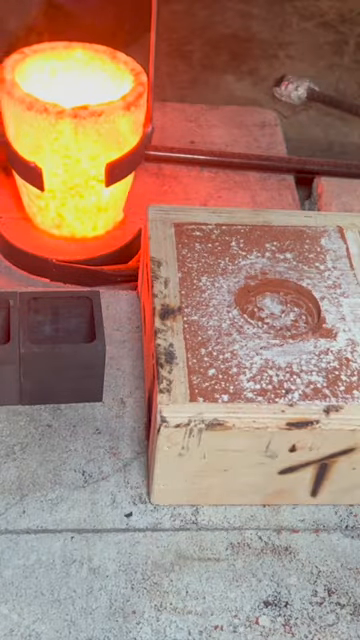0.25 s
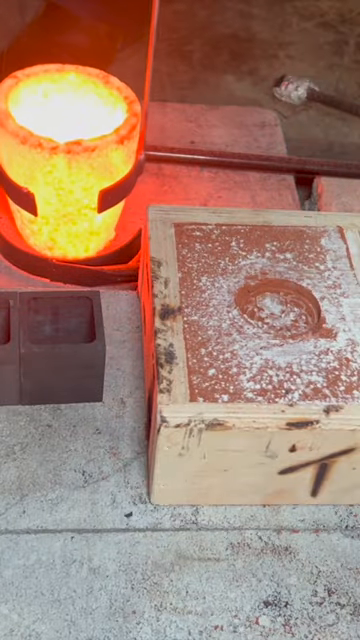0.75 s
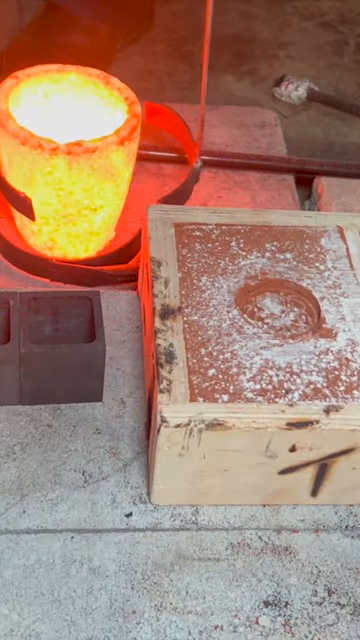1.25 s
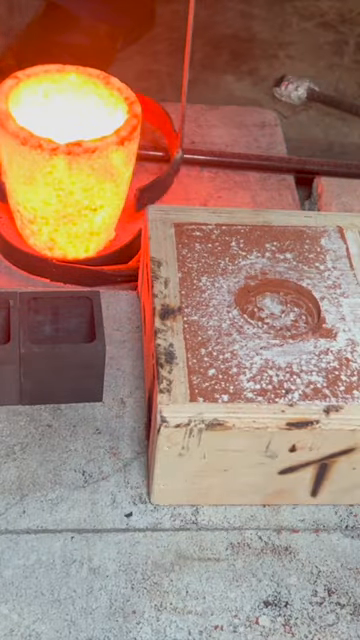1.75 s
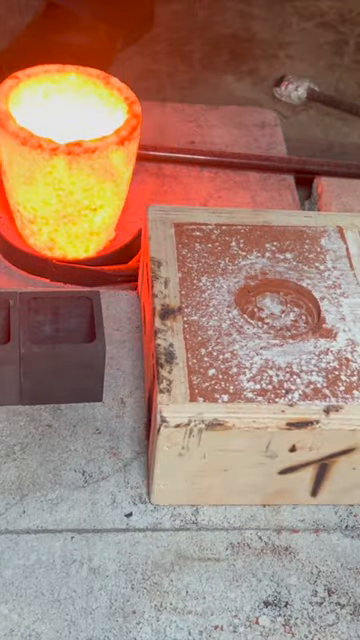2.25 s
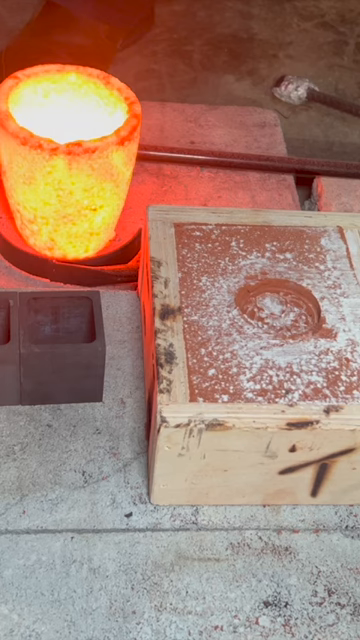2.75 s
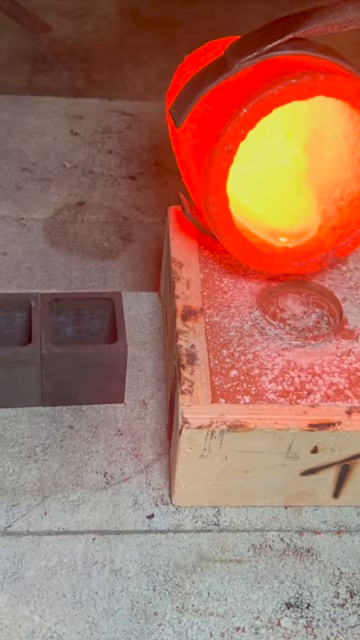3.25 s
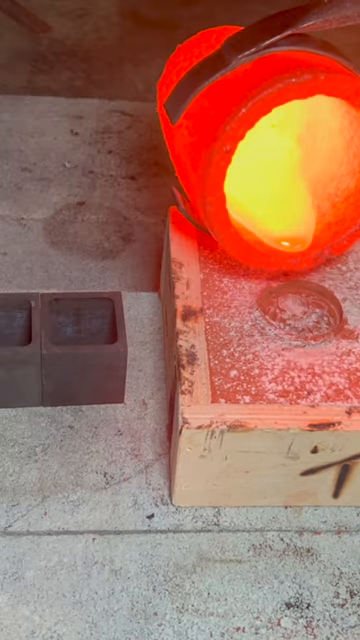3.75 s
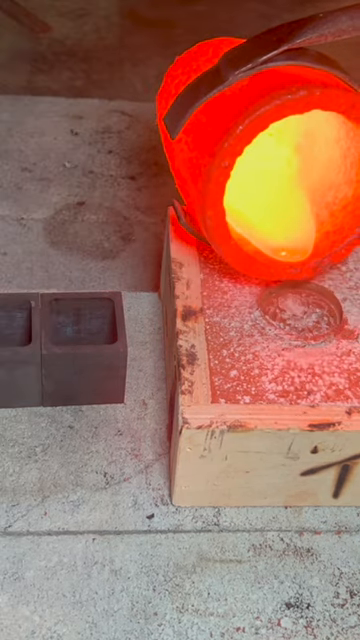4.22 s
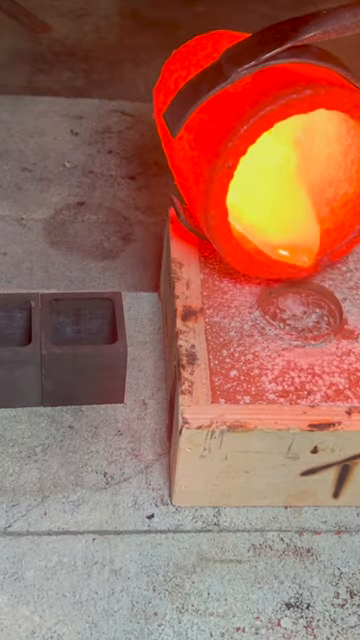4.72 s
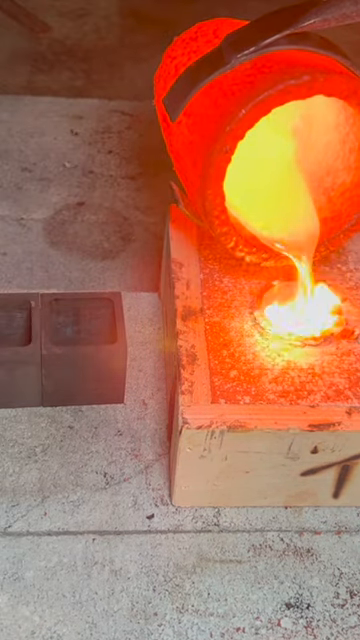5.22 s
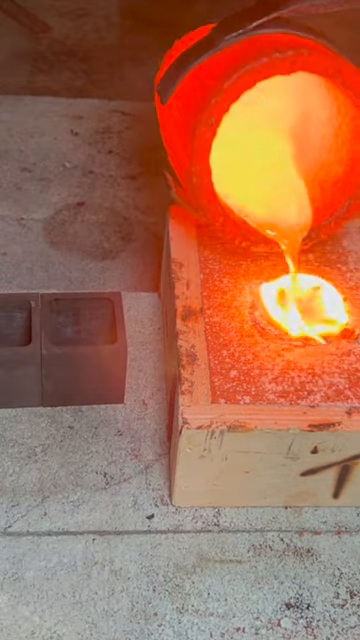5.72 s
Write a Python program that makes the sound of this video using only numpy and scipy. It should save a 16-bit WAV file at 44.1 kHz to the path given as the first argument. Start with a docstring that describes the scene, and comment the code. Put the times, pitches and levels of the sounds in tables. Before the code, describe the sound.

Quiet workshop rumble with tong scrapes, one loud bright metallic clank, small ticks and creaks, then a faint gurgling, crackling pour into a mould.

```python
"""A low workshop rumble is heard first, then steel tongs scrape on a crucible by stick and slip.
Dropped steel skids and clanks on the concrete floor: a chatter of contacts excites its modes.
The loaded tongs tick, rub and creak: shaped bursts of filtered noise.
Molten metal splats into a sand mould: falling sine chirps over a noise crunch and a granular gurgle.
Swells of crackling hiss continue as the mould sizzles; a diffuse tail of noise is the room."""
import sys
import numpy as np
from scipy import signal
from scipy.fft import rfft, irfft
from scipy.io import wavfile

SR = 44100
rng = np.random.default_rng(int(sys.argv[2]) if len(sys.argv) > 2 else 0)


def to_wav(sig):
    """Store sig (one row per channel, or 1-D mono) as 16-bit WAV at the path in sys.argv[1].

    Samples outside -1..1 are clipped; the rate is SR.
    """
    pcm = np.clip(np.atleast_2d(sig), -1, 1) * 32767
    pcm = np.round(pcm).astype(np.int16)
    wavfile.write(sys.argv[1], SR, pcm.T)  # frames by channels


N = 263718
TIME = np.arange(N) / SR
EDGE_HZ = 16100  # upper band limit
TILT_S = 3.05  # the crucible is tilted over the mould

# swells of rustle and hiss, as the tools are handled and then as the mould sizzles:
# (middle [s], length [s], rustle level [dB], hiss level [dB])
SWELLS = [(.7, 0.73, -79, -80), (2.62, .8, -73.5, -78.5), (3.415, 0.72, -72, -79.5),
          (4.17, 1.03, -78.5, -79), (5.2, 1.25, -79, -75.5), (5.919, 0.77, -81, -76.5)]
# contacts of the steel with the floor: (time [s], relative level [dB])
CLANK = [(2.485, -18.5), (2.4872, -20.5), (2.4924, -24), (2.5072, -29.5)]
# blobs of metal landing in the sand: (time [s], relative level [dB])
SPLATS = [(4.836, -50), (4.846, -42), (4.8527, -34), (4.8615, -38), (4.8693, -38.5), (4.8909, -37),
          (4.9324, -44), (4.946, -52), (5.0997, -47), (5.228, -56), (5.3429, -51), (5.516, -53.5),
          (5.615, -56.5)]


def amp(db):
    """Logarithmic level: decibels to amplitude gain."""
    return 10 ** (np.asarray(db) / 20)


def unit(x):
    """Power normalisation: scales to rms 1."""
    return x / np.sqrt(np.mean(x ** 2) + 1e-20)


def read(points, hz):
    """Interpolation along a logarithmic frequency axis, as pitch is heard."""
    f, value = np.transpose(points)
    return np.interp(np.log(hz + 1), np.log(f + 1), value)


def level(rows):
    """Amplitude envelope, linear in dB between rows and silent beyond 0.1 s outside them."""
    s, db = np.transpose(rows)
    return amp(np.interp(TIME, s, db)) * (TIME >= s[0] - .1) * (TIME <= s[-1] + .1)


def fade(t, t60):
    """Exponential decay of a damped system, 60 dB down at t60."""
    return np.exp(-np.log(1000) * t / np.maximum(t60, 1e-3))


def arch(middle_s, length_s):
    """Raised-cosine envelope: a smooth rise and fall."""
    return np.cos(np.pi * np.clip((TIME - middle_s) / length_s, -.5, .5)) ** 2


def stroke(start_s, hold_s, rise_s, t60):
    """Exponential approach to a steady force, a hold, then exponential release."""
    t = np.maximum(TIME - start_s, 0)
    return (1 - np.exp(-t / rise_s)) * fade(np.maximum(t - hold_s, 0), t60)


def together(gains):
    """Incoherent summation: the powers of unrelated noises add."""
    return np.sqrt(sum(gain ** 2 for gain in gains))


def add(mix, s, sound):
    """Linear superposition of a sound starting at time s."""
    part = mix[..., round(s * SR):][..., :sound.shape[-1]]
    part += sound[..., :part.shape[-1]]


def colour(x, points, size=4096):
    """Minimum-phase filtering to a spectrum; white noise keeps its power."""
    log_gain = np.log(amp(read(points, abs(np.fft.fftfreq(size, 1 / SR)))))
    # the Hilbert transform of log gain supplies the phase of a causal filter
    spectrum = np.exp(signal.hilbert(log_gain).conj())
    taps = np.fft.ifft(spectrum).real[:size // 2]
    taps = taps / np.linalg.norm(taps)
    return signal.oaconvolve(x, taps[None], axes=1)[:, :x.shape[1]]


def pair(x):
    """Interchannel coherence: mixes two unrelated signals into a microphone pair, band by band."""
    # likeness of left and right in a diffuse field: (frequency [Hz], coherence [-1 to 1])
    alikeness = [(100, 0.96), (300, 0.86), (800, 0.16), (2000, 0.42), (4000, 0.12), (6000, 0.56),
                 (8000, 0.36), (12000, 0.072), (14000, 0.92)]
    z = rfft(x)
    alike = np.clip(read(alikeness, np.fft.rfftfreq(x.shape[1], 1 / SR)), -1, 1)
    right = alike * z[0] + np.sqrt(1 - alike ** 2) * z[1]
    return irfft(np.array([z[0], right]), x.shape[1])


def noise(count):
    """Gaussian white noise at two partly coherent microphones."""
    return pair(rng.standard_normal((2, count)))


def leftward(x):
    """Interchannel level difference of tools lying to the left."""
    # (frequency [Hz], left minus right [dB])
    lean = [(700, 0), (1300, 2.5), (2400, 2.5), (4200, 6), (6000, 6.5), (8000, 2.5), (12000, 0)]
    lean_db = read(lean, np.fft.rfftfreq(N, 1 / SR))
    return irfft(rfft(x) * amp(np.array([lean_db, -lean_db]) / 2), N)


def dying(x, t60s):
    """Frequency-dependent damping: every band decays at its own rate."""
    hz, t, z = signal.stft(x, SR, nperseg=256)
    decay = fade(t, read(t60s, hz)[:, None])
    return signal.istft(z * decay, SR, nperseg=256)[1]


def grains(per_s, spread_db, size=40):
    """Random point process: millisecond noise puffs of uneven strength, scaled to rms 1."""
    strength_db = np.minimum(spread_db * rng.exponential(1, N), 14)
    strength = amp(strength_db) * (rng.random(N) < per_s / SR)
    power = np.convolve(strength ** 2, np.hanning(size), "same")
    return unit(noise(N) * np.sqrt(power))


def ringing(hz, db, t60):
    """Modal superposition: dying sines, each with its own phase at each microphone."""
    t = np.arange(SR // 2) / SR
    phase = rng.uniform(0, 2 * np.pi, len(hz)) + 1.3 * rng.standard_normal((2, len(hz)))
    modes = fade(t, t60[:, None]) * np.exp(2j * np.pi * hz[:, None] * t)
    return ((amp(db) * np.exp(1j * phase)) @ modes).real


def room(x, gap_s=0.002):
    """Diffuse reverberation: convolution with noise that builds up, then decays band by band."""
    # reverberation time: (frequency [Hz], t60 [s])
    room_t60 = [(100, 0.46), (500, 0.19), (2000, 0.25), (6000, 0.33), (14000, 0.28)]
    tail = dying(noise(SR), room_t60)
    tail *= 1 - np.exp(-(np.arange(tail.shape[1]) / SR / gap_s) ** 2)
    return signal.oaconvolve(x, tail / np.linalg.norm(tail[0]), axes=1)[:, :N]


def rumble(drift_gain_db=2, bump_s=0.14):
    """Band-shaped Gaussian noise: a slowly drifting rumble with soft low bumps."""
    # slow drift, before its gain: (time [s], level [dB])
    drift = [(0.0, -68.5), (0.2, -67.5), (2.05, -63.5), (2.41, -57), (2.96, -64.5), (3.48, -62.5),
             (4.53, -71), (5.98, -68.5)]
    # soft bumps: (middle [s], level [dB])
    bumps = [(.1, -60.5), (.58, -61), (2.24, -52.5), (2.51, -55.5), (3.27, -57.5), (3.61, -56),
             (4.871, -59), (5.13, -63.5), (5.562, -57), (5.9, -65)]
    # relative power density: (frequency [Hz], density [dB per Hz])
    spectrum = [(18, -40), (30, -16.5), (40, -3), (55, -5.5), (82, 2.5), (115, -6), (170, -11.5),
                (250, -23), (400, -35), (700, -54.5)]
    hz = np.fft.rfftfreq(N, 1 / SR)
    swell = together([amp(drift_gain_db) * level(drift)] + [amp(db) * arch(s, bump_s) for s, db in bumps])
    return unit(irfft(rfft(noise(N)) * amp(read(spectrum, hz)), N)) * swell


def air(still_db=-80):
    """Steady noise plus random grains: faint air that swells into rustle."""
    # relative power density: (frequency [Hz], density [dB per Hz])
    spectrum = [(150, -1.5), (300, 5), (500, -2), (800, -5.5), (1200, -8.5), (1900, -8.5), (2700, -14.5),
                (4000, -16.5), (8000, -24.5), (14000, -38)]
    rustle = together([amp(still_db)] + [amp(db) * arch(s, length) for s, length, db, _ in SWELLS])
    return colour(noise(N) + 0.51 * grains(per_s=320, spread_db=4.5), spectrum) * rustle


def hiss(still_db=-87):
    """Steady noise plus sparser grains: a hiss with a fine crackle in it."""
    # relative power density: (frequency [Hz], density [dB per Hz])
    spectrum = [(1000, -26), (4500, -6.5), (6000, -11), (8000, -2), (11500, -0.5), (13500, 1.5),
                (16000, -2.5)]
    sizzle = together([amp(still_db)] + [amp(db) * arch(s, length) for s, length, _, db in SWELLS])
    return colour(noise(N) + 0.81 * grains(per_s=110, spread_db=3.0), spectrum) * sizzle


def thin_hiss():
    """Filtered Gaussian noise: a thin steady hiss near 2.7 kHz from about 3 s to the end."""
    # (time [s], level [dB])
    envelope = [(2.85, -105), (3.05, -85), (4.5, -87.5), (5.98, -80.5)]
    # relative power density: (frequency [Hz], density [dB per Hz])
    spectrum = [(1000, -33), (2200, -8.5), (2700, -3.5), (3300, -23.5), (6000, -20)]
    return colour(noise(N), spectrum) * level(envelope)


def workshop():
    """Superposition of the background noises."""
    return rumble() + air() + hiss() + thin_hiss()


def faint_ticks(per_s=7, mean_db=-64, spread_db=3, knock_db=-7.5):
    """Uniformly random instants after the tilt: rows (time [s], snap [dB], knock re snap [dB])."""
    span_s = N / SR - TILT_S
    draws = rng.random((max(round(per_s * span_s), 1), 2))
    return [(TILT_S + when * span_s, mean_db + spread_db * (2 * size - 1), knock_db)
            for when, size in draws]


def ticks(ring_s=0.018, knock_ring_s=0.041, rise_s=0.00091):
    """Impulsive slips: a bright snap and a longer dull knock; scuffs are drawn-out knocks."""
    # clearer ticks of steel and hot grit, before the mix gains:
    # (time [s], snap level [dB], knock level relative to the snap [dB])
    clear_ticks = [(0.9727, -50, -20), (1.0914, -56, -13), (1.234, -65, -4), (2.9027, -41, -2.5),
                   (2.9233, -59, -4), (3.043, -58, 0), (3.3132, -50.5, -0.5), (3.5885, -47, 0),
                   (3.6286, -48, -12), (3.914, -56, -0.5), (4.101, -47.5, -16), (4.2639, -57.5, 3),
                   (4.618, -65, 1.5), (4.8324, -52.5, 3), (4.884, -55.5, -12), (5.2838, -57, -17),
                   (5.361, -53.5, -0.5), (5.6925, -55.5, -12), (5.7915, -49, -15), (5.9622, -48.5, -9)]
    # soft scuffs of handling, before the mix gain: (time [s], level [dB], length [s])
    scuffs = [(2.828, -65, .055), (2.9, -62, .06), (3.29, -68, .08), (3.36, -70, .12), (3.57, -65, .08),
              (4.262, -66, .06)]
    # relative power densities of snap and knock: (frequency [Hz], density [dB per Hz])
    snap_spectrum = [(1200, -16), (2700, 4), (5000, -1.5), (8000, 2.5), (13000, -1), (16000, -5.5)]
    knock_spectrum = [(120, -16.5), (350, 6), (600, -1), (900, -1), (1400, -4), (2500, -9), (4500, -14.5),
                      (9000, -44.5)]
    t, snap, knock = np.arange(SR // 5) / SR, np.zeros(N), np.zeros(N)
    for s, db, knock_db in clear_ticks + faint_ticks():
        blow = amp(db) * (1 - np.exp(-t / rise_s))
        add(snap, s, blow * fade(t, ring_s))
        add(knock, s, blow * amp(knock_db) * fade(t, knock_ring_s))
    for s, db, length in scuffs:
        add(knock, s, amp(db) * np.hanning(round(length * SR)))
    bright = amp(-1.0) * colour(snap * noise(N), snap_spectrum)
    dull = amp(-2.0) * colour(knock * noise(N), knock_spectrum)
    return bright + dull


def creaks():
    """Intermittent friction: the loaded tongs give way in short gritty slips."""
    # (time [s], level [dB], length [s])
    creak_times = [(5.634, -66.5, 0.049), (5.674, -67, 0.034), (5.731, -67.5, 0.028), (5.781, -61.5, 0.025),
                   (5.8, -76, 0.055)]
    # relative power density: (frequency [Hz], density [dB per Hz])
    spectrum = [(900, -4), (1700, 12.5), (2300, -3), (2900, 2.5), (4500, -18), (5400, -20), (5800, -15),
                (6400, -14), (8400, 9.5), (9500, -21), (11700, 9), (13000, -4), (16000, -16)]
    slip = np.zeros(N)
    for s, db, length in creak_times:
        add(slip, s, amp(db) * np.hanning(round(length * SR)))
    return colour(slip * grains(per_s=570, spread_db=1.5), spectrum)


def turning():
    """Granular friction noise through resonant colouring: the turning tongs rub with a hollow tone."""
    # (middle [s], length [s], level [dB])
    turns = [(3.33, 1, -77), (4.193, 0.62, -81)]
    # relative power density: (frequency [Hz], density [dB per Hz])
    spectrum = [(350, -19), (570, -1), (700, -12), (830, -11), (940, 2), (1150, -15), (2000, -26),
                (5000, -49)]
    effort = together([amp(db) * arch(s, length) for s, length, db in turns])
    return colour(grains(per_s=780, spread_db=1.5) * effort, spectrum)


def scrape(split_hz=1200):
    """Stick-slip excitation of modes: slips shake the low ones, breaking grit rings the high ones."""
    # slips of the tongs: (start [s], hold [s], grit level [dB], shudder of the arms [dB])
    slip_times = [(.515, 0.053, -52, -52), (0.603, .012, -54, -80), (0.662, .012, -45.5, -74),
                  (0.695, 0.024, -62.5, -56), (0.972, 0.027, -55, -53), (0.99, 0.027, -51, -47.5),
                  (1.087, 0.0066, -60.5, -52), (1.111, 0.058, -85, -58.5), (1.127, 0.0066, -62, -70)]
    # light rubbing of the jaws between slips: (middle [s], length [s], level [dB])
    rubs = [(0.647, 0.71, -67), (1.13, 0.58, -77.5)]
    # how freely the jaws ring, damped while they still grip: (time [s], gain [dB])
    freedom = [(.8, -15), (1, -3), (1.1, 0), (1.35, -4)]
    # relative power density of the grit: (frequency [Hz], density [dB per Hz])
    grit_spectrum = [(300, -12), (700, -1.5), (1100, -16), (1700, -5), (2800, -16.5), (4000, -11.5),
                     (4700, -11.5), (6500, -5), (8000, 3), (11000, 1.5), (12500, -3), (15500, -17)]
    # modes of the tongs: (frequency [Hz], relative level [dB], t60 [s])
    tong_modes = [(303, 0, .14), (358, -8, .07), (400, -8, .07), (636, -13, .1), (780, -13, .08),
                  (1541, -19, .14), (1862, -21, .1), (2224, -17, .1), (3770, -8, .07), (5340, -13, .04),
                  (5900, -13, .035), (7400, -9, .02), (7900, -8, .02), (8450, -8, .02), (9680, -7, .03),
                  (10830, -9, .025), (13600, -15, .025)]
    rubbing = [amp(db) * arch(s, length) for s, length, db in rubs]
    grinding = [amp(db) * stroke(s, hold, rise_s=0.0039, t60=.14) for s, hold, db, _ in slip_times]
    shudder = [amp(db) * stroke(s, hold, rise_s=0.015, t60=0.14) for s, hold, _, db in slip_times]
    grit = grains(per_s=1600, spread_db=1.5) * together(rubbing + grinding)
    slips = grains(per_s=1200, spread_db=6.0) * together(shudder)
    free = amp(np.interp(TIME, *np.transpose(freedom)))
    out = amp(-4.0) * colour(grit, grit_spectrum)
    t = np.arange(SR // 2) / SR
    for hz, db, t60 in tong_modes:
        mode = fade(t, t60) * np.sin(2 * np.pi * hz * t)
        mode = mode / np.linalg.norm(mode)
        drive = amp(-3.0) * slips if hz < split_hz else free * grit
        out = out + amp(db) * signal.oaconvolve(drive, mode[None], axes=1)[:, :N]
    return leftward(out)


def skid(touch_s=2.4265, touch_t60=.03):
    """Sliding friction as dense grains: the steel touches the floor and slides until it clanks."""
    # relative power density: (frequency [Hz], density [dB per Hz])
    spectrum = [(500, -22), (2000, -11), (4000, -9.5), (6500, -14), (7700, 0), (8700, 1.5), (9400, -9),
                (11000, -1), (12000, -12), (16000, -15)]
    touch = amp(-44) * stroke(touch_s, 0, rise_s=.0005, t60=touch_t60)
    slide = amp(-59.5) * stroke(touch_s, CLANK[0][0] - touch_s, rise_s=.002, t60=touch_t60)
    # a faint bright noise swells up to the touch, before the clank, and is gone soon after the clank
    faint = amp(-70.5) * arch(touch_s, .28)
    loudness = together([touch, slide, faint])
    return leftward(colour(grains(per_s=4800, spread_db=1.5) * loudness, spectrum))


def clank(count=260):
    """Impact excitation: each contact starts a crack, a dense crowd of modes and a rattle."""
    # relative colour of the contacts: (frequency [Hz], density [dB per Hz])
    crash_spectrum = [(25, -26), (100, -4), (400, -17), (800, -14.5), (1500, -9), (2300, -8.5),
                      (4000, -8.5), (5400, -3), (8000, 0.5), (11000, -3), (13500, 1.5), (14800, -9),
                      (16000, -24)]
    # decay of the crowd of modes and the rattle: (frequency [Hz], t60 [s])
    crash_t60 = [(150, 0.44), (1400, 0.29), (3000, 0.35), (6500, 0.3), (9000, 0.22), (14000, .16)]
    # separate clear modes of the dropped steel: (frequency [Hz], relative level [dB], t60 [s])
    steel_modes = [(1026, -46.0, 0.27), (1521, -45.0, 0.3), (1879, -44.0, 0.39), (2178, -42.0, 0.31),
                   (2336, -39.0, 0.27), (2524, -43.0, 0.28), (2890, -42.0, 0.28), (3050, -37.0, 0.24),
                   (3335, -41.0, 0.28), (3499, -41.0, 0.33), (4089, -42.0, 0.33), (4502, -38.0, 0.27),
                   (4832, -41.0, 0.34), (5346, -36.0, 0.36), (5942, -38.0, 0.29), (6417, -33.0, 0.26),
                   (6776, -33.0, 0.27), (7025, -40.0, 0.28), (7555, -37.0, 0.3), (8053, -38.0, 0.25),
                   (8330, -43.0, 0.27), (8872, -44.0, 0.25), (11521, -37.0, 0.18), (12295, -41.0, 0.23),
                   (12940, -43.0, 0.24)]
    t, out = np.arange(SR // 2) / SR, np.zeros((2, N))
    hz = (np.arange(count) + rng.random(count)) * EDGE_HZ / count + 200
    mode_db = 1.6 * rng.standard_normal(count)
    crowd = ringing(hz, mode_db, read(crash_t60, hz)) * np.sqrt(2 / count)
    for s, blow_db in CLANK:
        rattle = dying(noise(len(t)), crash_t60)[:, :len(t)]
        crack = noise(len(t)) * fade(t, 0.03)
        body = .7 * crowd + .7 * rattle
        add(out, s, amp(blow_db) * colour(amp(-6.0) * body + amp(-0.5) * crack, crash_spectrum))
    # the first contact adds the clear modes
    add(out, CLANK[0][0], amp(.5) * ringing(*np.transpose(steel_modes)))
    return leftward(out)


def gush():
    """Granular turbulence: the first rush of metal gurgles into the mould and dies down."""
    # relative power density: (frequency [Hz], density [dB per Hz])
    spectrum = [(100, -13), (280, -14), (450, -4), (680, -4), (1100, -26), (1500, -16), (2500, -40),
                (5000, -45)]
    flow = amp(-54.5) * stroke(SPLATS[0][0], 0.057, rise_s=.012, t60=0.29)
    return colour(grains(per_s=650, spread_db=5.0) * flow, spectrum)


def droplets(mean_lag_s=0.0096, relative_db=-7.5):
    """Secondary impacts at random lags: rows like SPLATS, a weaker drop after each blob."""
    lags = rng.random(len(SPLATS))
    return [(s + mean_lag_s * (.5 + lag), db + relative_db) for (s, db), lag in zip(SPLATS, lags)]


def pour(settled_hz=420, glide_s=0.001, rise_s=0.0012, ring_s=0.019, sand_s=0.014):
    """Damped chirp plus noise: a blob's pitch drops as it flattens, over a gritty crunch of sand."""
    # relative power density of the crunch: (frequency [Hz], density [dB per Hz])
    sand_spectrum = [(120, -6), (300, 9.5), (700, 5.5), (1100, -4), (1800, 1), (2800, -9), (4200, -33),
                     (9000, -41)]
    # a harder blob starts at a higher pitch
    reference_hz, reference_db, db_per_octave = 1760, -40.5, 33
    t, slap, sand = np.arange(SR // 10) / SR, np.zeros(N), np.zeros(N)
    for s, db in SPLATS + droplets():
        hz = reference_hz * 2 ** ((db - reference_db) / db_per_octave)
        cycles = np.cumsum(settled_hz + (hz - settled_hz) * np.exp(-t / glide_s)) / SR
        envelope = (1 - np.exp(-t / rise_s)) * fade(t, ring_s)
        add(slap, s, amp(db) * envelope * np.sin(2 * np.pi * cycles))
        add(sand, s, amp(db) * fade(t, sand_s))
    # slap gains in dB at left and right
    return slap * amp([[2.7], [2.3]]) + amp(-5) * colour(sand * noise(N), sand_spectrum)


def scene():
    """Superposition of direct and reverberant sound, each source with its share of the room."""
    tongs = scrape()
    steel = clank() + skid()
    small = ticks() + creaks() + turning()
    metal = pour() + gush()
    echo = room(amp(-12.5) * tongs + amp(-20) * steel + amp(-8.5) * small + amp(-12.5) * metal)
    return workshop() + tongs + steel + small + metal + echo


def record(dry, opposite_hz=9980, width_hz=1100):
    """Phase opposition of spaced microphones near one treble pitch, then a band limit."""
    hz = np.fft.rfftfreq(N, 1 / SR)
    turn = np.pi / 2 * np.exp(-((hz - opposite_hz) / width_hz) ** 2)
    mid, side = rfft(dry[0] + dry[1]) / 2, rfft(dry[0] - dry[1]) / 2
    # the common part turns into the difference
    mid, side = mid * np.cos(turn), side + 1j * mid * np.sin(turn)
    ports = irfft(np.array([mid + side, mid - side]), N)
    low_pass = signal.firwin(301, EDGE_HZ, window=("kaiser", 9), fs=SR)
    return signal.oaconvolve(ports, low_pass[None], "same")


dry = scene()
out = record(dry)
to_wav(out)
```